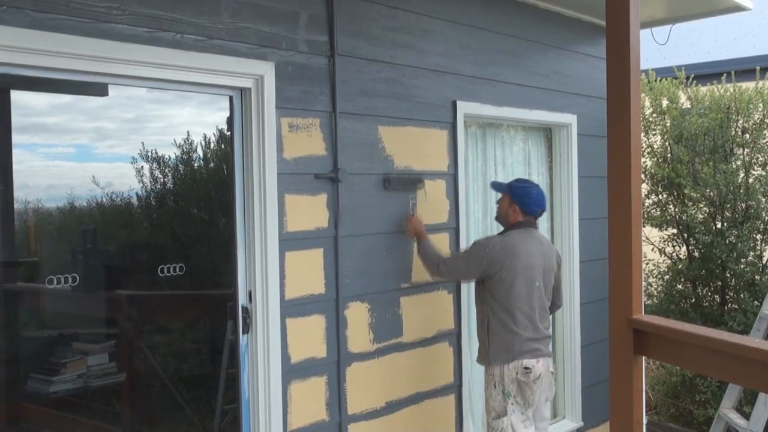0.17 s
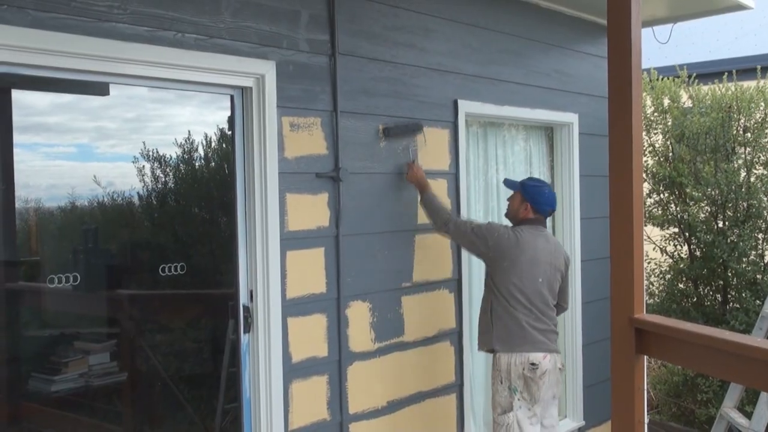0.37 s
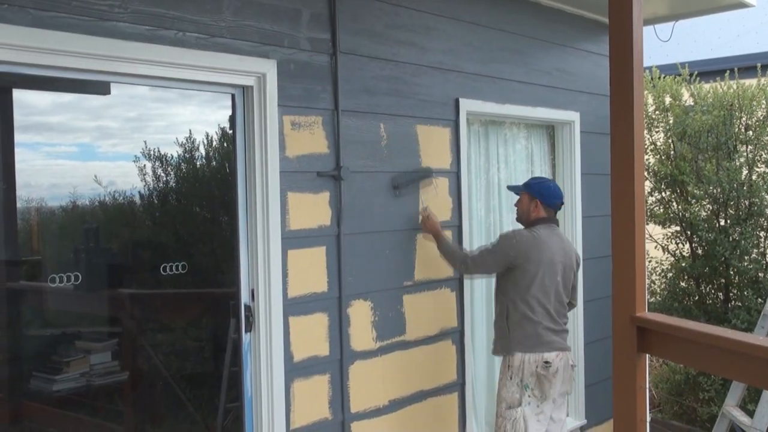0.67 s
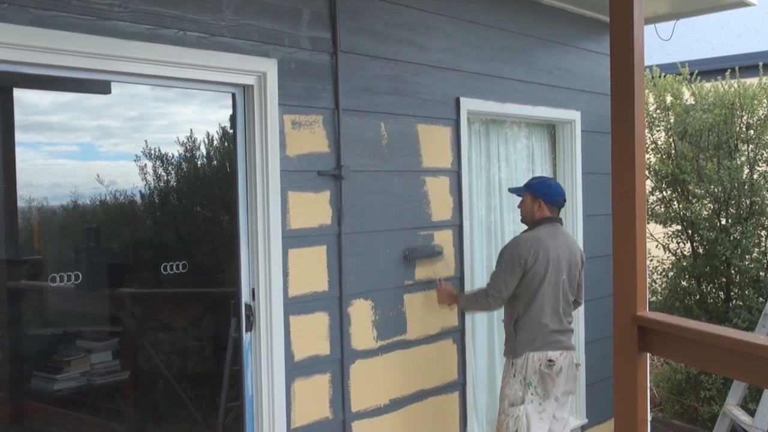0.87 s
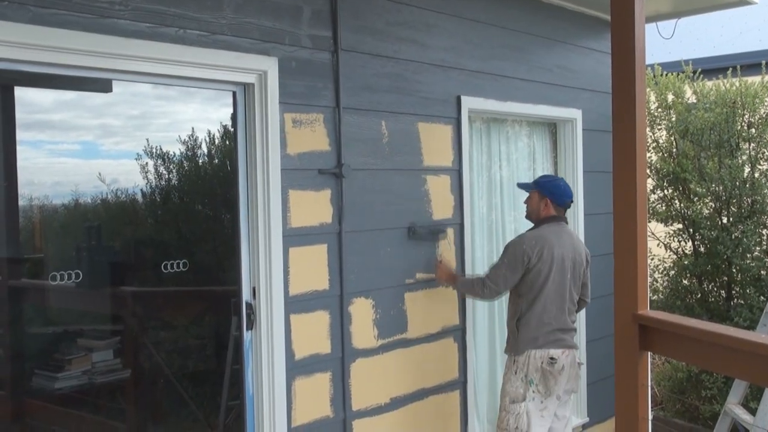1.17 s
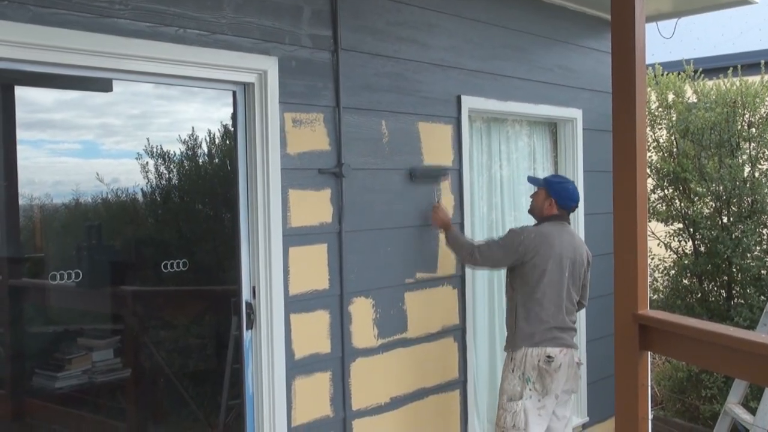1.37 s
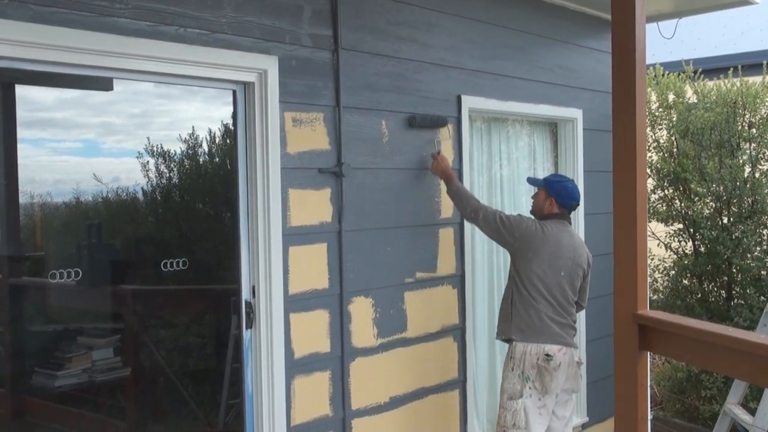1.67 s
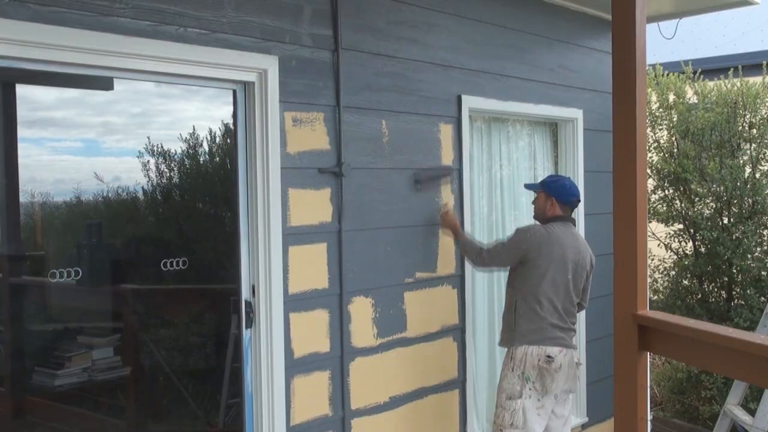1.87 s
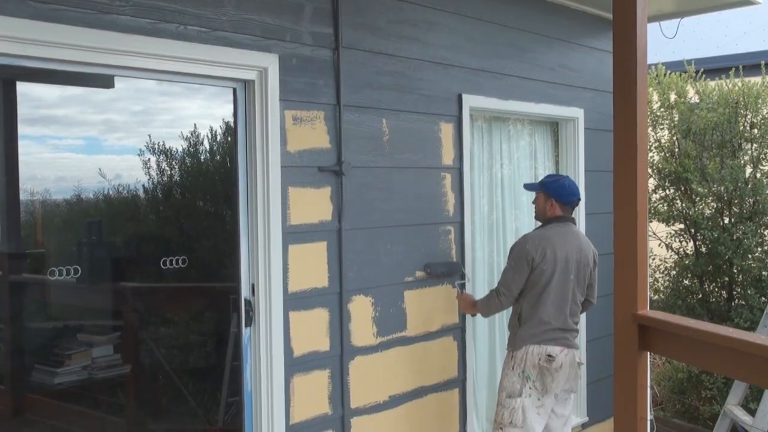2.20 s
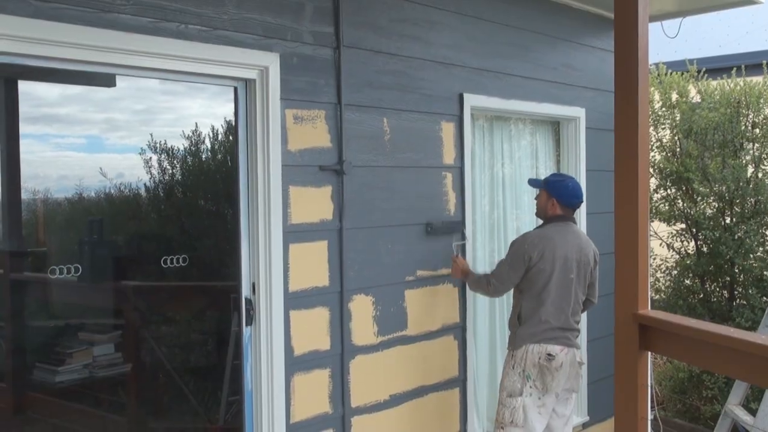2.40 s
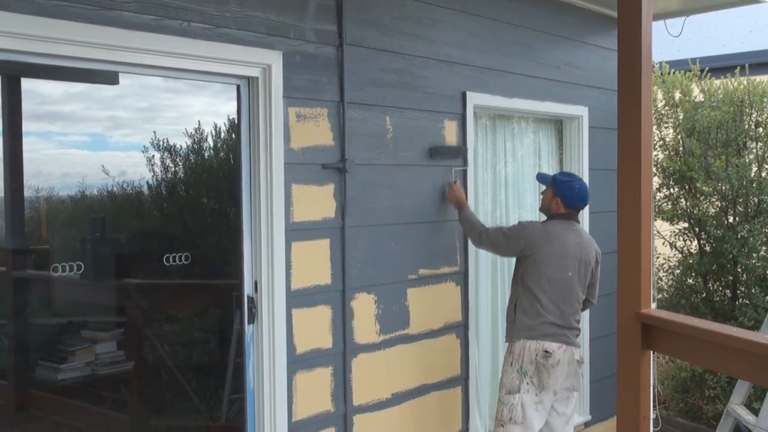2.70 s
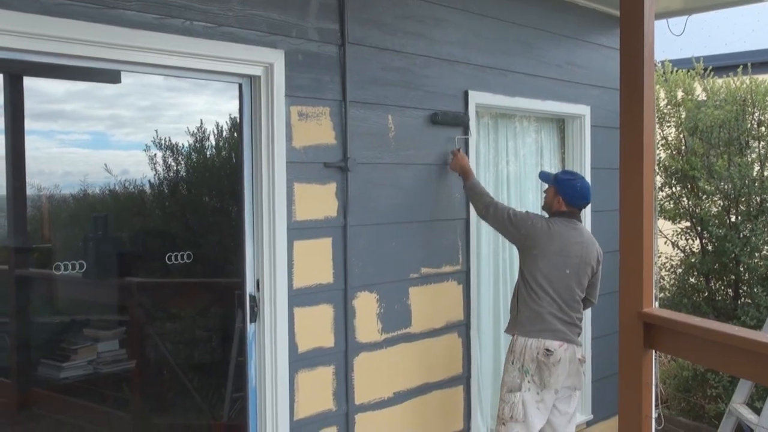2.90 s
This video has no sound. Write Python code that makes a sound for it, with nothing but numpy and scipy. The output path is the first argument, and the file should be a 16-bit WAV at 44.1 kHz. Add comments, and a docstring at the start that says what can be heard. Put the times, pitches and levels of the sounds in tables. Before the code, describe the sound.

A wet paint roller makes a sticky, crackling hiss in five strokes, turning near 0.6, 1.2, 1.8 and 2.4 s, the last running to the end. Mid-stroke, squelch and low wall rumble thicken it, strongest near 0.95 and 2.1. Hollow knocks and splats mark board edges, notably 0.2, 0.9, 1.4, 2.2 and 2.6. Small ticks, faint clinks and brief hums; close, short reflections, quiet outdoor wash.

```python
"""An outdoor wall of lapped cement boards, where a wet paint roller goes up and down in five strokes.
Threads of tacky paint snap behind the nap: dense random clicks, filtered into a crackling hiss.
Where the arm presses hardest a deeper squelch joins in, and filtered noise makes the wall rumble.
Board edges give knocks, splats and brief losses of grip; paint blisters tick, the frame clinks and hums.
Short scattered reflections and a faint outdoor wash lie behind."""
import sys
import numpy as np
from scipy import signal
from scipy.fft import rfft, irfft
from scipy.io import wavfile

SR = 44100
rng = np.random.default_rng(int(sys.argv[2]) if len(sys.argv) > 2 else 0)


def file_out(sig):
    """Save sig as 16-bit WAV at sys.argv[1]."""
    # one column per channel
    cols = np.atleast_2d(sig).T
    # limit, then scale
    lim = np.clip(cols, -1, 1)
    pcm = np.round(lim * 32767).astype(np.int16)
    wavfile.write(sys.argv[1], SR, pcm)


N = 134505  # samples, about 3 s


def amp(db):
    """Turns decibels into a gain."""
    return 10 ** (np.asarray(db) / 20)


def evened(x):
    """Scales to rms 1."""
    return x / np.sqrt(np.mean(x ** 2) + 1e-20)


def add(mix, start_s, sound):
    """Mixes a sound in at a time, cut off at the end of the mix."""
    part = mix[max(round(start_s * SR), 0):][:len(sound)]
    part += sound[:len(part)]


def bell(t, centre_s, width_s):
    """A smooth swell to 1 that has fallen to 1/e one width away."""
    return np.exp(-((t - centre_s) / width_s) ** 2)


def coloured(x, spectrum, size=4096):
    """Shapes a sound with a minimum-phase filter of the given spectrum; rms 1."""
    hz, db = np.transpose(spectrum)
    bin_hz = abs(np.fft.fftfreq(size, 1 / SR))
    log_gain = np.log(amp(np.interp(np.log(bin_hz + 1), np.log(hz), db)))
    taps = np.fft.ifft(np.exp(np.conj(signal.hilbert(log_gain)))).real[:size // 2]
    return evened(signal.oaconvolve(x, taps)[:len(x)])


def wander(span_s):
    """Smooth random drift that changes over about this time; rms 1."""
    hz = np.fft.rfftfreq(N, 1 / SR)
    return evened(irfft(rfft(rng.standard_normal(N)) / (1 + (2 * hz * span_s) ** 4), N))


def resonate(x, hz, width_hz):
    """A resonance of gain 1 whose pitch can glide: shift to 0 Hz, smooth, shift back."""
    turn = np.exp(2j * np.pi * np.cumsum(hz * np.ones(len(x))) / SR)
    r = np.exp(-np.pi * width_hz / SR)
    return 2 * (turn * signal.lfilter([1 - r], [1, -r], x / turn)).real


def struck(modes):
    """An object's answer to one blow: a sum of decaying sine modes."""
    t = np.arange(SR // 3) / SR
    return sum(amp(db - 60 * t / t60) * np.sin(2 * np.pi * hz * t) for hz, db, t60 in modes)


def snaps(spread_db, snaps_per_s=9000, largest=4.6):
    """Threads snapping: dense tiny clicks, a few much larger; spread_db times a capped chance sets each size."""
    size = amp(spread_db * np.minimum(rng.exponential(1, N), largest))
    return size * rng.choice([-1., 1.], N) * (rng.random(N) < snaps_per_s / SR)


# spectrum of the outdoor wash: pitch_hz, level_db per Hz
OUTDOOR_SPECTRUM = [(25, -13), (60, -11), (130, 1), (270, -10), (440, 3), (620, 0), (850, -1), (1300, -9),
                    (1900, -11.5), (4000, -11.5), (7000, -15), (10000, -19), (14000, -34), (15500, -33)]
OUTDOORS_DB, GUST_DB, GUST_S = -36.5, .6, 0.1  # mean level, rms drift, drift time


def outdoors():
    """Distant wash: filtered noise with a slight drift in level."""
    level = amp(OUTDOORS_DB + GUST_DB * wander(GUST_S))
    return level * coloured(rng.standard_normal(N), OUTDOOR_SPECTRUM)


PORCH_DB, PORCH_T60_S, PORCH_DELAY_S, ECHOES_PER_S = -18, 0.16, .004, 2000


def porch(x):
    """Brief scattered reflections from deck and roof: sparse random echoes that die away."""
    t = np.arange(SR // 3) / SR
    taps = rng.choice([-1., 1.], len(t)) * (rng.random(len(t)) < ECHOES_PER_S / SR)
    taps = taps * (t > PORCH_DELAY_S) * amp(-60 * t / PORCH_T60_S)
    return signal.oaconvolve(x, taps / np.linalg.norm(taps))[:N]


# the wire frame clinks around the turn of a stroke: start_s, level_db
CLINKS = [(.611, -28), (1.868, -26), (2.449, -31)]
# ringing modes of the wire frame: pitch_hz, level_db, t60_s
FRAME_MODES = [(2180, 0, .04), (2480, -4, .03), (3500, -6, .025), (4050, -10, .02)]


def clinks():
    """The wire frame gets a tap and rings in its own modes."""
    out = np.zeros(N)
    for start_s, level_db in CLINKS:
        add(out, start_s, amp(level_db) * struck(FRAME_MODES))
    return out


# the hollow sleeve hums as it spins up: centre_s, width_s, pitch_hz at the centre, level_db
HUMS = [(.755, .035, 860, -35.5), (0.804, 0.022, 407, -30), (2.023, 0.015, 604, -31.5),
        (2.557, .03, 410, -32)]
HUM_WIDTH_HZ, HUM_FALL_HZ_PER_S = 140, 770


def sleeve_hums():
    """The hollow sleeve hums: noise through a resonance that slides down in pitch."""
    t, out = np.arange(N) / SR, np.zeros(N)
    for centre_s, width_s, hz, level_db in HUMS:
        pitch_hz = hz - HUM_FALL_HZ_PER_S * np.clip(t - centre_s, -2 * width_s, 2 * width_s)
        hum = evened(resonate(rng.standard_normal(N), pitch_hz, HUM_WIDTH_HZ))
        out += amp(level_db) * bell(t, centre_s, width_s * np.sqrt(2)) * hum
    return out


CONTACT_RISE_S = .0007  # onset of pops, splats and slaps
POP_S = 0.0015  # fall of a pop to 1/e
# single paint bubbles and ticks: start_s, level_db (before halving)
POPS = [(.066, -8), (0.147, -1.5), (1.052, -1), (1.121, -6), (1.147, -8.5), (1.695, -7), (1.798, -5.5),
        (2.146, -15), (2.338, -12), (2.395, -10.5), (2.515, -7), (2.903, -6)]
# spectrum of the paint hiss, shared by the pops: pitch_hz, level_db per Hz
HISS_SPECTRUM = [(100, -22.5), (500, -9.5), (900, -11.5), (1600, -14), (2300, -6.5), (3500, 1.5),
                 (4300, -1), (5300, -1.5), (6900, 1.5), (8300, -2.5), (9600, -7), (12000, -18.5),
                 (14000, -24), (15500, -74)]


def pops():
    """Larger blisters of paint burst with a short tick of noise."""
    t, level = np.arange(SR // 50) / SR, np.zeros(N)
    for start_s, level_db in POPS:
        burst = np.minimum(t / CONTACT_RISE_S, 1) * np.exp(-t / POP_S)
        add(level, start_s, amp(level_db) * burst / 2)
    return level * coloured(rng.standard_normal(N), HISS_SPECTRUM)


# bumps over board edges: start_s, splat_db, splat_length_s, knock_db, knock_hz at onset,
# ring_db, slap_db
BUMPS = [(0.176, -19.5, 0.02, -4, 209, -1, -20), (0.38, -14.5, 0.0078, -10, 193, -12, -20),
         (0.854, -19, 0.0058, -13, 134, -28, -36), (0.872, -14.5, 0.008, -10.5, 352, -11, -24),
         (0.897, -20.5, 0.011, -12, 211, -33, -30), (1.0043, -16, 0.0038, -10.5, 227, -21, -44),
         (1.019, -21.5, 0.0062, -12, 146, -24, -46), (1.3672, -17.5, 0.017, -4.5, 430, -4.5, -20.5),
         (1.5681, -14, 0.015, -18, 307, -9.5, -20.5), (2.0575, -16, 0.0034, -19, 200, -20, -27),
         (2.066, -18.5, 0.0044, -18, 168, -30, -29), (2.2039, -14.5, 0.0087, -4, 201, -17.5, -33),
         (2.603, -11.5, 0.0062, -11, 488, -25, -18.5), (2.62, -39, .002, -10, 255, -32, -28),
         (2.8112, -14.5, 0.005, -46, 445, -31, -18), (2.821, -15.5, 0.0072, -15.5, 244, -45, -17)]
# ringing modes of a board, also heard in the rumble: pitch_hz, level_db, t60_s
BOARD_MODES = [(128, -5.5, 0.33), (170, 2, 0.15), (221.6, -1, 0.14), (266, 1, 0.15), (396, -13, 0.2),
               (447.3, 0, .09), (718, -13, 0.19), (856, -14, 0.27)]
# spectrum of the wet splat: pitch_hz, level_db per Hz
SPLAT_SPECTRUM = [(100, -20), (700, 4.5), (1500, -21), (2100, 3.5), (2700, 5.5), (4200, -2), (6000, -1.5),
                  (8000, -1), (11000, -17.5), (14000, -27), (15500, -71)]
# spectrum of the dull slap: pitch_hz, level_db per Hz
SLAP_SPECTRUM = [(50, -50), (180, 15.5), (400, 5), (750, -5.5), (1100, 2), (1700, -9.5), (3500, -19),
                 (15000, -67)]
SPLAT_FALL_S, CRACK, CRACK_S = 0.0018, .7, .004  # the crack is extra gain at the start of a splat
KNOCK_RISE_S, KNOCK_T60_S = 0.0031, 0.054
KNOCK_SAG, KNOCK_SAG_S = 0.24, 0.0124  # share of the pitch lost, and how quickly
RING_RISE_S, KNOCK_LOW_CUT_HZ = 0.0033, 76


def bumps():
    """An edge gives a splat that starts with a crack, a dull slap, a sagging knock and a ring of the board."""
    ring = struck(BOARD_MODES)
    t = np.arange(len(ring)) / SR
    ring = ring / abs(ring).max() * (1 - np.exp(-t / RING_RISE_S))
    crack = 1 + CRACK * np.exp(-t / CRACK_S)
    sag = 1 - KNOCK_SAG * (1 - np.exp(-t / KNOCK_SAG_S))
    splat, slap, knocks = np.zeros((3, N))
    for start_s, splat_db, length_s, knock_db, knock_hz, ring_db, slap_db in BUMPS:
        fall = np.exp(-np.maximum(t - length_s, 0) / SPLAT_FALL_S)
        contact = np.minimum(t / CONTACT_RISE_S, 1) * fall
        knock_level = np.minimum(t / KNOCK_RISE_S, 1) * amp(knock_db - 60 * t / KNOCK_T60_S)
        knock = knock_level * np.sin(2 * np.pi * np.cumsum(knock_hz * sag) / SR)
        add(splat, start_s, amp(splat_db) * contact * crack)
        add(slap, start_s, amp(slap_db) * contact)
        add(knocks, start_s, knock + amp(ring_db) * ring)
    knocks = signal.lfilter(*signal.butter(2, KNOCK_LOW_CUT_HZ, "high", fs=SR), knocks)
    wet = splat * coloured(snaps(spread_db=1), SPLAT_SPECTRUM)
    dull = slap * coloured(rng.standard_normal(N), SLAP_SPECTRUM)
    return wet + dull + knocks


# centres of the bands that crackle unevenly: pitch_hz
ACROSS_HZ = [2600, 4640, 7500, 9700]
ACROSS_S, ACROSS_DB = 0.013, 1.1  # drift time, rms drift


def uneven(x):
    """Parts of the nap crackle at different pitches, so each band swells and fades by itself."""
    hz = np.fft.rfftfreq(N, 1 / SR)
    out = np.zeros(N)
    for row in np.eye(len(ACROSS_HZ)):
        share = np.interp(hz, np.sort(ACROSS_HZ), row)  # overlapping bands that add up to 1
        out += irfft(rfft(x) * share, N) * amp(ACROSS_DB * wander(ACROSS_S))
    return out


# strokes, up and down in turn: start_s, end_s, speed_up_s, slow_down_s, hiss_db, squelch_db,
# rumble_db, hardest_push_s
STROKES = [(-.03, .645, 0.28, 0.082, -23, -26.5, -29.5, .24),
           (.635, 1.185, 0.29, 0.15, -19, -20.5, -26.5, .95),
           (1.18, 1.84, .19, .14, -21, -24.5, -31, 1.435), (1.84, 2.42, 0.32, 0.2, -20, -17.5, -26, 2.092),
           (2.40, 3.1, 0.21, 0.14, -22, -27, -31.5, 2.65)]
# grip changes beside an edge, mostly losses: centre_s, width_s, level_db
LIFTS = [(0.211, 0.022, -1), (.367, 0.0075, 0), (.405, 0.02, -3), (.844, 0.013, -4), (.865, 0.0066, -10),
         (0.89, 0.0055, -6), (.992, 0.034, -8), (1.4, 0.017, -4.5), (1.561, 0.0049, -0.5),
         (1.597, 0.023, -7.5), (2.05, 0.0036, -11.5), (2.202, 0.021, -8.5), (2.232, 0.027, -5.5),
         (2.598, 0.004, 0.5), (2.625, 0.021, -5.5), (2.845, .022, -7)]
# patches of tackier paint that make the hiss surge: centre_s, width_s, level_db
PATCHES = [(0.098, 0.0062, 6), (0.147, 0.037, 4.5), (.312, 0.018, 4), (0.493, 0.03, 6), (0.923, .03, 0),
           (1.08, 0.01, 3), (1.666, 0.0045, 6), (1.695, 0.0062, 5), (1.76, 0.018, 3), (1.917, 0.039, 6),
           (2.147, 0.0056, 5), (2.568, 0.048, 3.5), (2.709, 0.025, 3), (2.887, 0.0087, 3)]
# time on the top board, start_s, end_s; a row that ends before it starts boosts instead
TOP_BOARD = [(.395, 0.82), (1.59, 2.05), (2.835, 2.8)]
# spectrum of the squelch: pitch_hz, level_db per Hz
SQUELCH_SPECTRUM = [(100, -66), (600, -6), (1200, -12.5), (1650, -17.5), (1900, -4.5), (2200, 4.5),
                    (2700, 4.5), (3600, -0.5), (5000, -3), (8000, -6.5), (11000, -80), (15500, -80)]
# spectrum of the wall rumble: pitch_hz, level_db per Hz
RUMBLE_SPECTRUM = [(25, -60), (50, -3), (90, -13), (125, 2.5), (180, -4.5), (300, 0.5), (420, -1.5),
                   (600, -18.5), (1200, -15), (3000, -73), (15000, -111)]
EASE, RUMBLE_EASE = 1.193, 0.98  # exponents on the speed curve
PUSH_S, RUMBLE_PUSH_S, RUMBLE_LIGHT = 0.14, 0.15, 0.39  # widths of the push; rumble share without it
TOP_SQUELCH_DB, TOP_RUMBLE_DB, CROSSING_S = -6, -1, 0.01
CLUMP_S, CLUMP_DB, NAP_S, NAP_DB = 0.0015, 2, 0.0085, 0.84  # drift times and rms drifts of the paint
SNAP_SPREAD_DB, SQUELCH_SPREAD_DB = 4, 2.5
NOTCH_LOW_HZ, NOTCH_HIGH_HZ = 4740, 2520  # the dip's pitch with the roller low and high
NOTCH_WIDTH_HZ, NOTCH_DEPTH = 800, 0.31
BOARD_SHARE, RUMBLE_GRIP = 0.43, 0.64  # board modes in the rumble; how far it follows grip


def rolling():
    """Hiss follows the roller's speed; squelch and rumble also follow the arm's push and the board."""
    t = np.arange(N) / SR
    hiss, squelch, rumble, height = np.zeros((4, N))
    for k, (start, end, rise, fall, hiss_db, squelch_db, rumble_db, push_at) in enumerate(STROKES):
        ramp = np.clip(np.minimum((t - start) / rise, (end - t) / fall), 0, 1)
        speed = np.sin(np.pi / 2 * ramp ** EASE)
        height += (-1) ** k * np.cumsum(speed) / speed.sum()  # 0 low, 1 high
        hiss += amp(hiss_db) * speed ** EASE
        squelch += amp(squelch_db) * speed * bell(t, push_at, PUSH_S * np.sqrt(2))
        push = RUMBLE_LIGHT + (1 - RUMBLE_LIGHT) * bell(t, push_at, RUMBLE_PUSH_S)
        rumble += amp(rumble_db) * speed ** RUMBLE_EASE * push
    on_top = sum(np.tanh((t - a) / CROSSING_S) - np.tanh((t - b) / CROSSING_S) for a, b in TOP_BOARD) / 2
    squelch *= amp(TOP_SQUELCH_DB * on_top)
    grip_db = sum(db * bell(t, s, width) for s, width, db in LIFTS)
    patch_db = sum(db * bell(t, s, width) for s, width, db in PATCHES)
    tack = amp(grip_db + patch_db + CLUMP_DB * wander(CLUMP_S) + NAP_DB * wander(NAP_S))

    paint = hiss * coloured(snaps(SNAP_SPREAD_DB), HISS_SPECTRUM)
    paint = paint + squelch * coloured(snaps(SQUELCH_SPREAD_DB), SQUELCH_SPECTRUM)
    # a dip in the paint sound glides with the roller's height
    notch_hz = NOTCH_LOW_HZ + (NOTCH_HIGH_HZ - NOTCH_LOW_HZ) * height
    paint = paint - NOTCH_DEPTH * resonate(paint, notch_hz, NOTCH_WIDTH_HZ)

    boards = evened(signal.oaconvolve(rng.standard_normal(N), struck(BOARD_MODES))[:N])
    wall = evened(coloured(rng.standard_normal(N), RUMBLE_SPECTRUM) + BOARD_SHARE * boards)
    rumble *= amp(TOP_RUMBLE_DB * on_top + RUMBLE_GRIP * grip_db)
    return tack * uneven(paint) + rumble * wall


def scene():
    """Roller and tool with their reflections, over the outdoor wash."""
    roller = rolling() + bumps() + pops() + clinks() + sleeve_hums()
    return (roller + amp(PORCH_DB) * porch(roller) + outdoors())[None]


LOW_CUT_HZ, HIGH_CUT_HZ = 72, 15600


def record(dry):
    """Peaks round off near full scale; then a low cut and a steep high cut."""
    held = dry / (1 + dry ** 6) ** (1 / 6)
    held = signal.lfilter(*signal.butter(2, LOW_CUT_HZ, "high", fs=SR), held)
    taps = signal.firwin(511, HIGH_CUT_HZ, window=("kaiser", 9), fs=SR)
    return signal.oaconvolve(held, taps[None], "same")


dry = scene()
out = record(dry)
file_out(out)
```